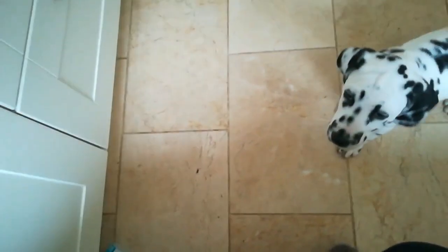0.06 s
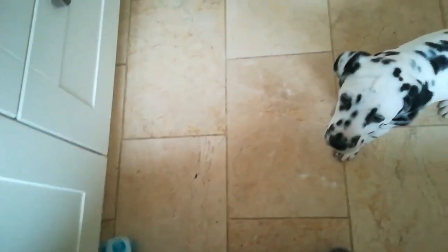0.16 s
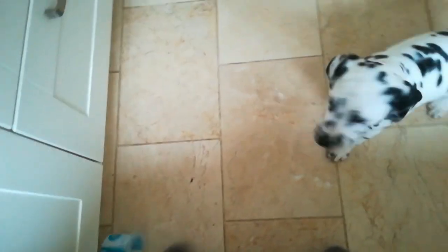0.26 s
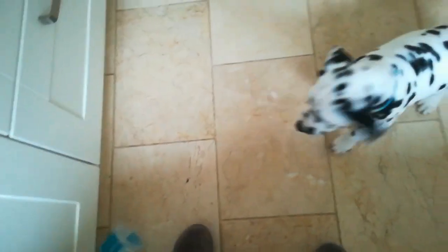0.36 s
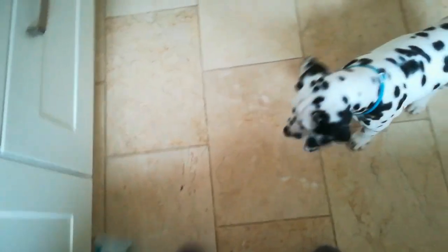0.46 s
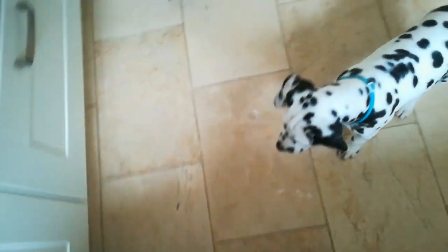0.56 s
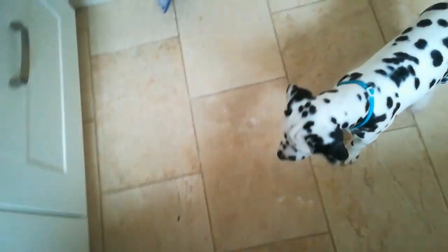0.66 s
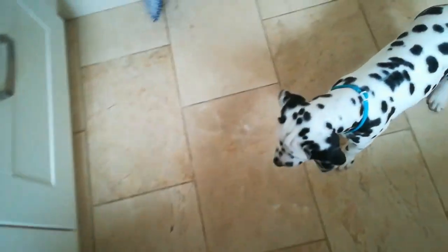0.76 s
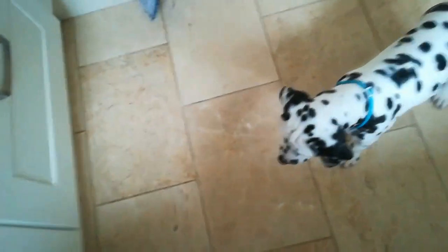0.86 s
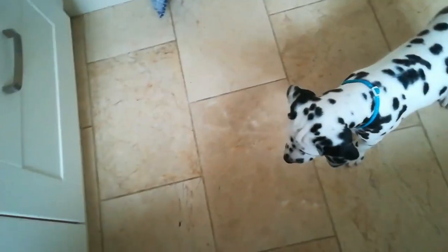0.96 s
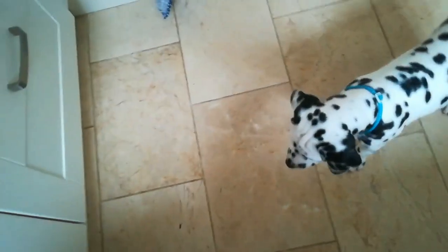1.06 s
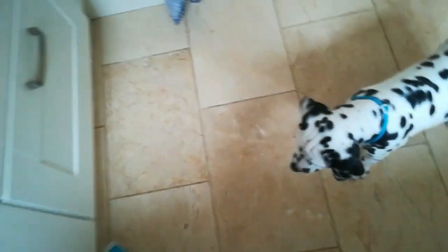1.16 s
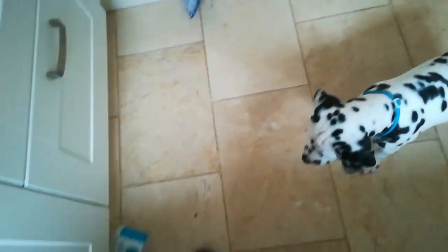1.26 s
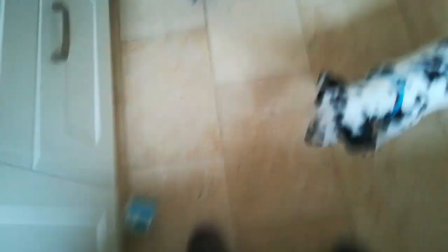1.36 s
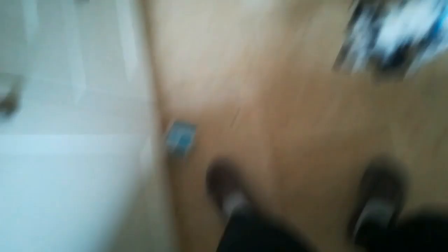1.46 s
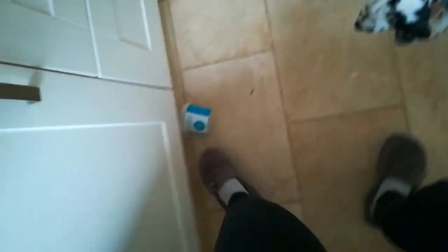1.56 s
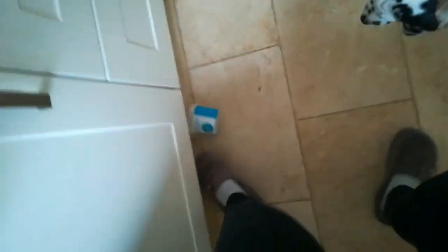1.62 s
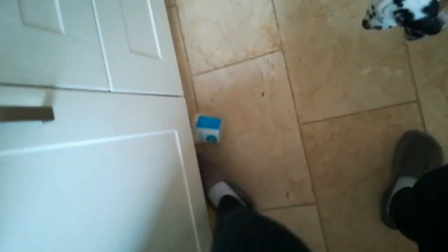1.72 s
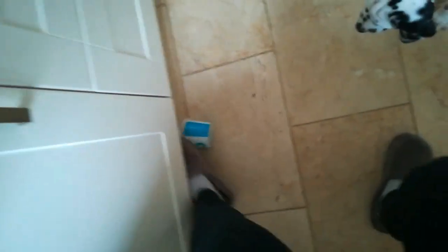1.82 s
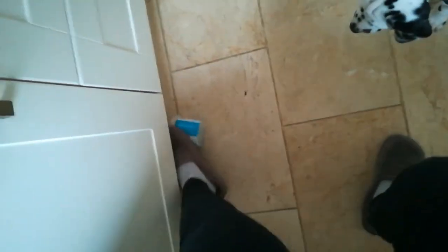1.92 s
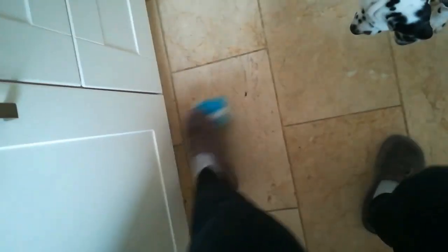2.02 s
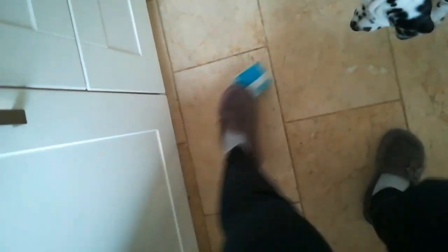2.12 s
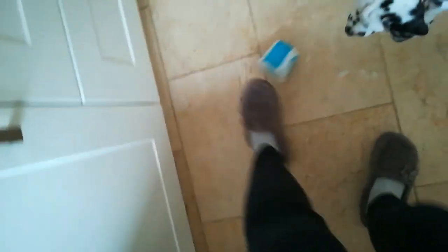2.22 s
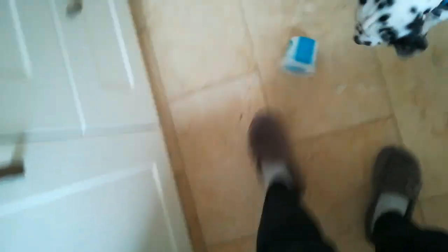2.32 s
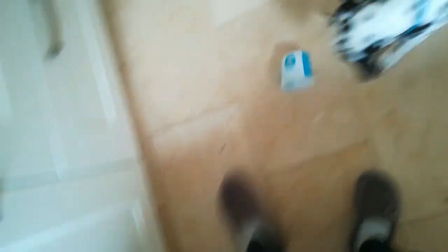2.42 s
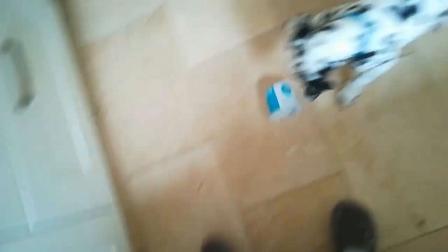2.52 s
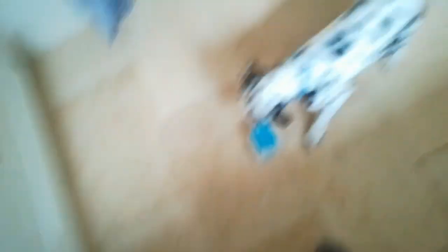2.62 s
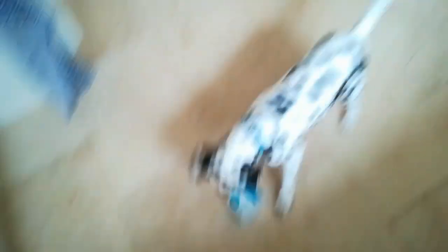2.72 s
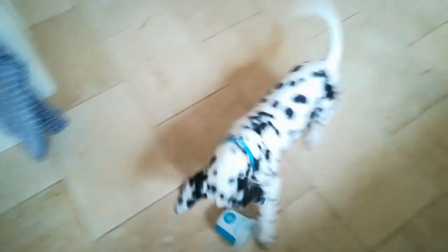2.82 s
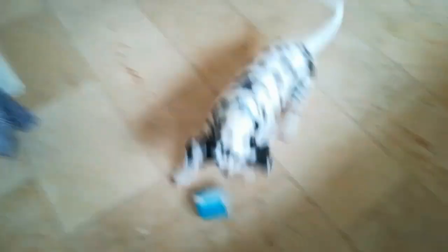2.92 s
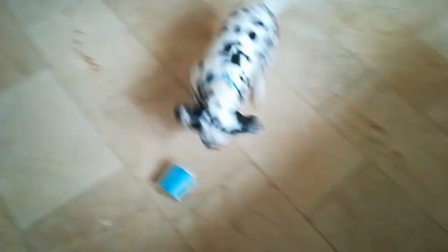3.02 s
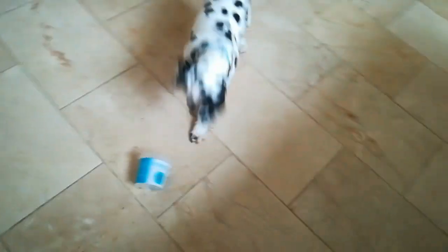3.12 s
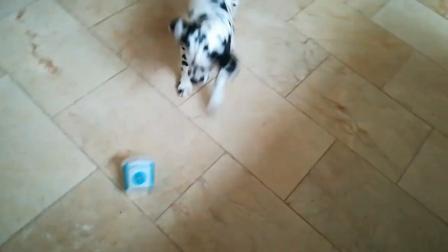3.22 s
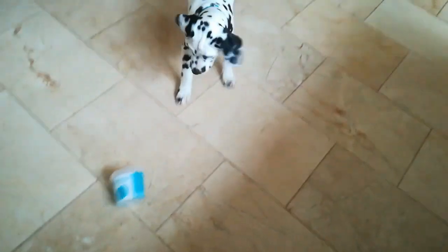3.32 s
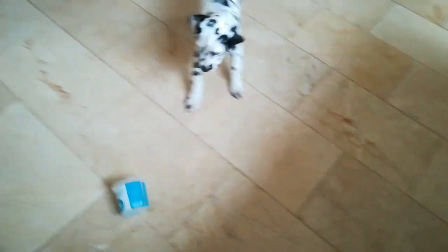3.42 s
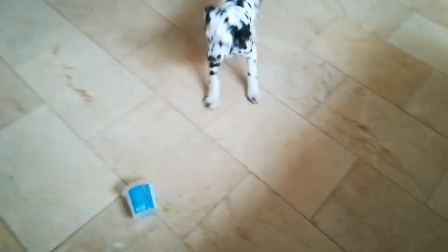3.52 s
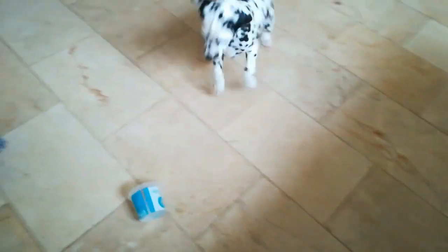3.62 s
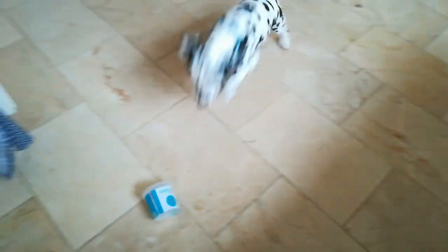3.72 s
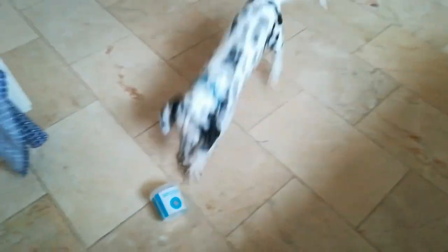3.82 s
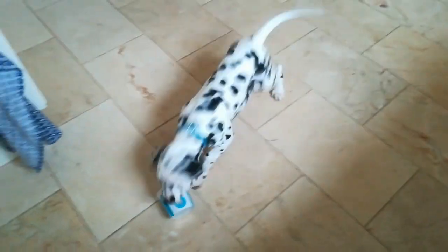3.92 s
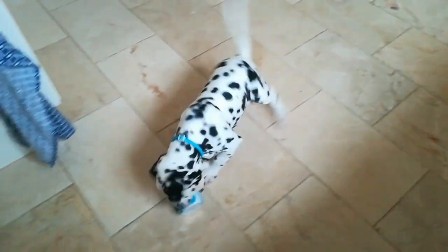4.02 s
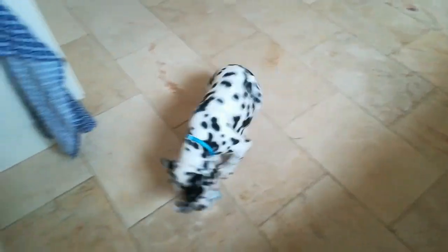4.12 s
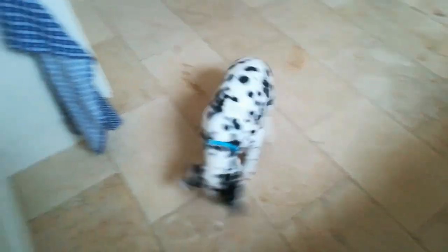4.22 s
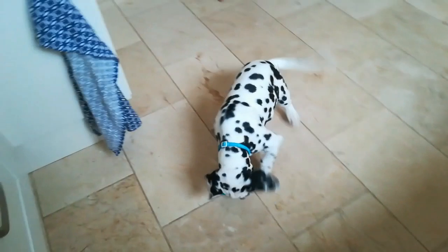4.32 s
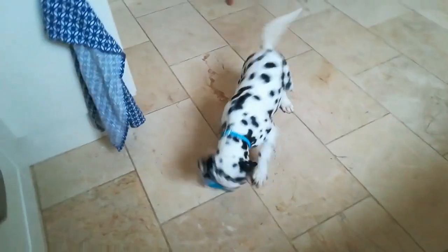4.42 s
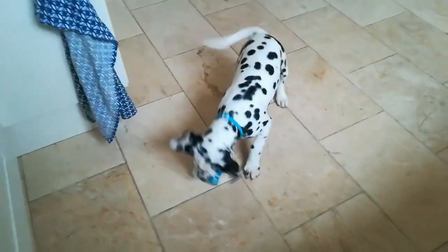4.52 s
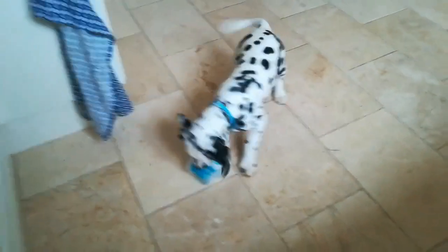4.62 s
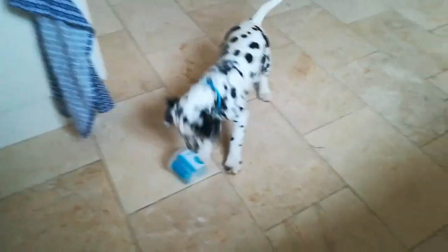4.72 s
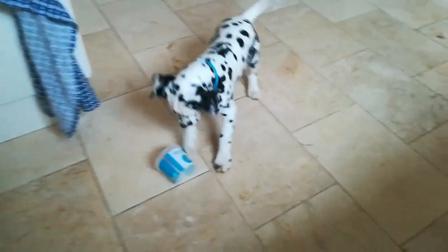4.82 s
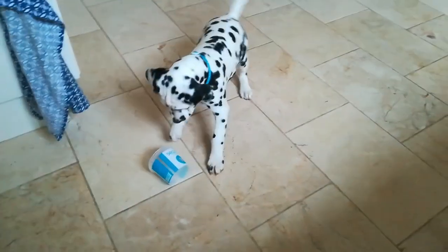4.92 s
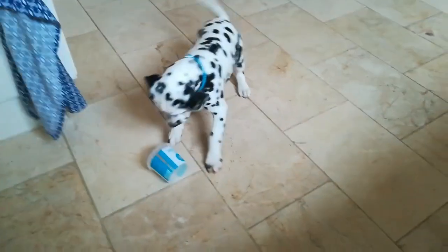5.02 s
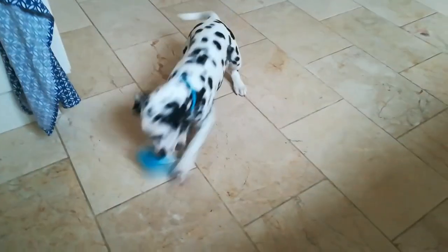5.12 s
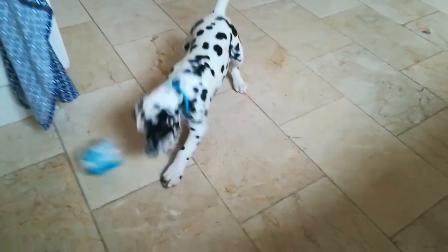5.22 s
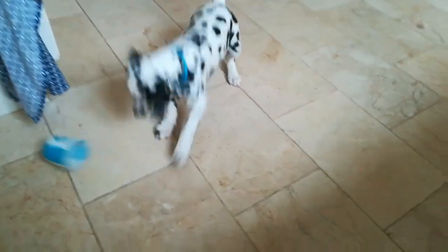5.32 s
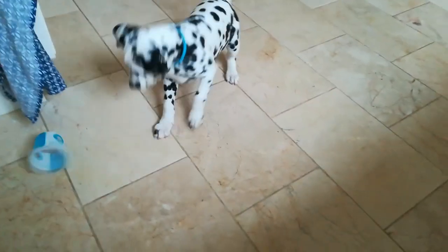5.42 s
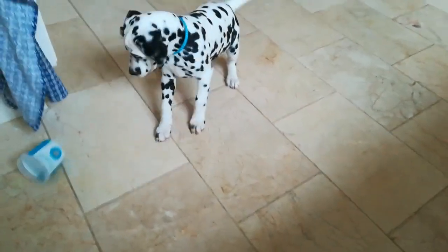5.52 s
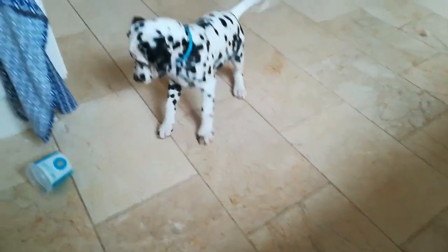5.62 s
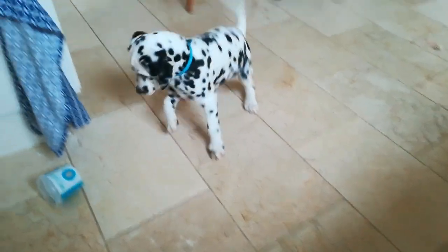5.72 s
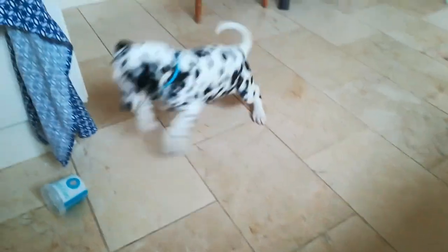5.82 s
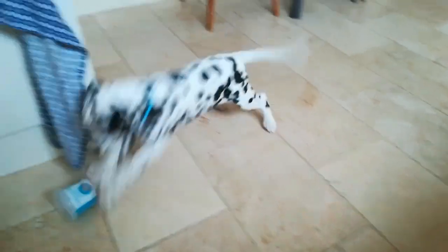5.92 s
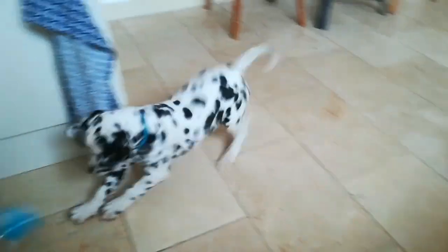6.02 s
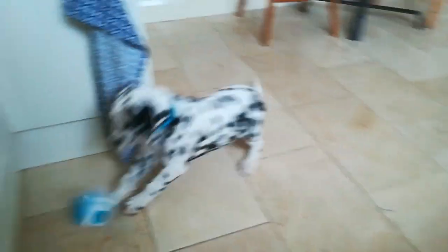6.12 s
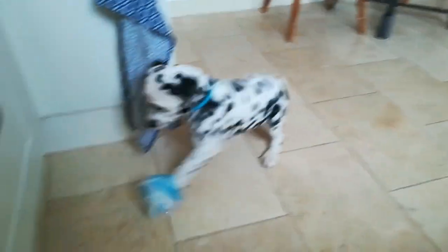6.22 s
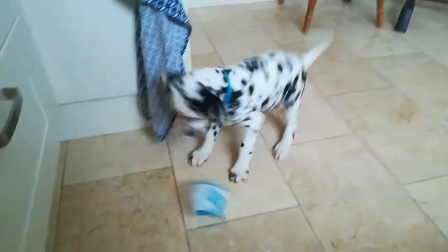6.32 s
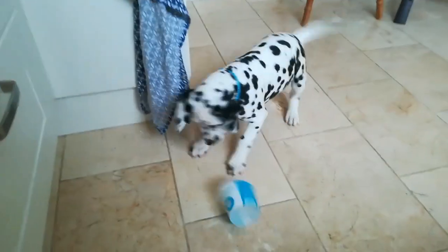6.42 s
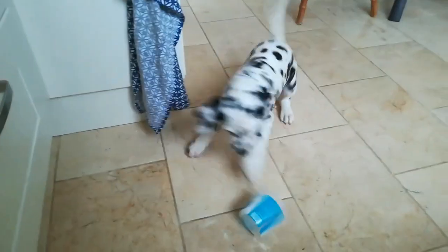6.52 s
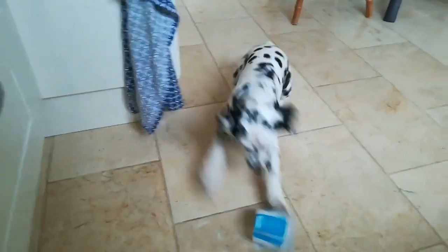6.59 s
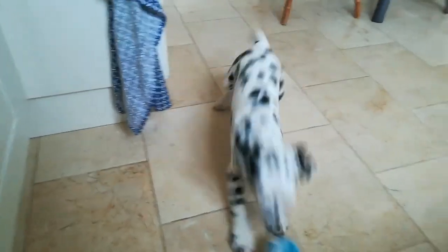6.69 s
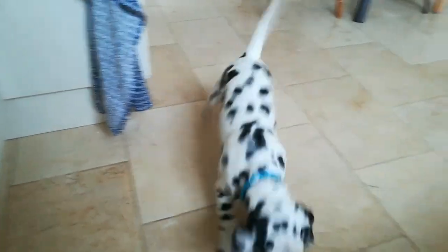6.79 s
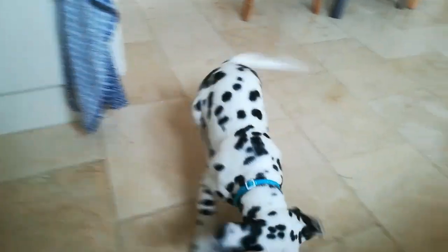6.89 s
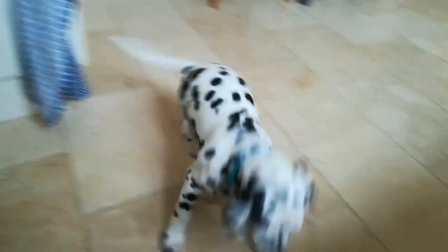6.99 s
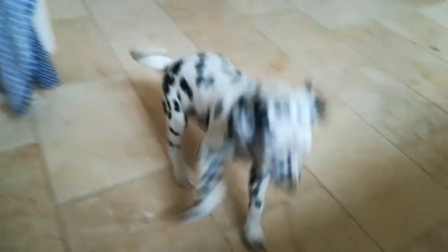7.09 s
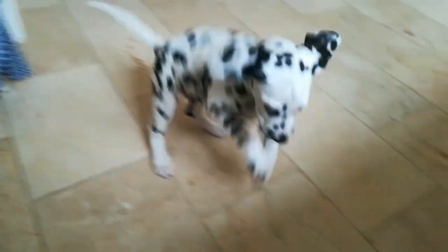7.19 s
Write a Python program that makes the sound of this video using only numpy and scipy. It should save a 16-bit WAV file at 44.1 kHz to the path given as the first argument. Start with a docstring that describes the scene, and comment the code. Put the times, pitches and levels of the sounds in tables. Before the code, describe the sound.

In a hard, echoing kitchen, a soft low footfall comes before a short run of hollow plastic knocks. A kick sends the container clattering and scraping over tiles. Paw scuffs, claw clicks and lighter taps follow with quieter gaps, until a violent slam into a cupboard rings out and more sharp bounces die away. Close handheld stereo microphones add faint rumble and hiss.

```python
"""A faint low rumble under hiss, a soft footfall, then hollow knocks and scrapes across a tiled kitchen floor.
A puppy chases a small plastic container: modal rings make its knocks and footfalls, shaped noise its
scrapes, claw clicks and paw scuffs. Near six seconds a hard swipe crashes it into a cupboard; a duller,
ringing echo lingers. Banded, decaying noise gives the hard room's echo; two microphones colour the result."""
import sys
import numpy as np
from scipy import signal
from scipy.fft import rfft, irfft, next_fast_len
from scipy.io import wavfile

SR = 44100
rng = np.random.default_rng(int(sys.argv[2]) if len(sys.argv) > 2 else 0)


def master(y):
    """Save y as 16-bit WAV."""
    cut = np.clip(np.atleast_2d(y).T, -1, 1)
    pcm = np.round(cut * 32767)  # scale
    wavfile.write(sys.argv[1], SR, pcm.astype(np.int16))


N = 319813
TIME = np.arange(N) / SR  # s

# pushes that slide the container: start_s, length_s, level_db, slowing_db_per_s, bite_db of the rim on the tile
SLIDE_MOVES = [(0.036, 0.26, -50.5, 7, -14), (1.878, .13, -61.5, 1, 7), (2.005, 0.096, -34.5, 18, 6.5),
               (2.114, 0.4, -38.5, 10, -4), (2.548, 0.22, -44, 20, -14.5), (2.88, .38, -48, 4.5, 5.5),
               (3.837, .255, -44.5, 20.5, 11.5), (4.131, 0.17, -50.5, 11, -4),
               (4.281, 0.15, -43.5, 4, -1.5), (4.51, .13, -45, 68.5, -11.5), (5.114, 0.25, -45.5, 7, 0),
               (5.351, .17, -42, 24, -2), (5.539, 0.09, -43.5, 38, -9.5), (5.96, .06, -30.5, 6, 6.5),
               (6.587, 0.38, -38.5, 48, -5), (7.0, 0.23, -52.5, 24, -3)]
# ring of the stiff container walls: pitch_hz before detuning, level_db, t60_s
STIFF_WALLS = [(2748, -2.5, 0.039), (3536, -1, 0.026), (4148, 1.5, 0.014), (4580, -3, 0.02),
               (5800, -10.5, .012), (6260, -11.5, 0.0071), (7540, -20.5, .008)]
# bright spectrum of hard edges and grit on tile: frequency_hz, level_db
GRIT_SPECTRUM = [(4000, -28.5), (7500, -5.5), (10000, 1.5), (13000, -3.5), (16000, -7)]


def undb(db):
    """Decibels to gain."""
    return 10 ** (np.asarray(db) / 20)


def fade(t, t60):
    """Exponential decay, 60 dB down after t60 seconds."""
    return np.exp(-np.log(1000) * t / t60)


def unit(x):
    """Scale to an rms of one."""
    return x / np.sqrt(np.mean(x ** 2))


def band(x, lo_hz, hi_hz, order=3):
    """Causal band-pass."""
    sections = signal.butter(order, [lo_hz, min(hi_hz, SR / 2 - 10)], "band", fs=SR, output="sos")
    return signal.sosfilt(sections, x)


def colour(x, points):
    """Filter x by a curve of (Hz, dB) points, joined by straight lines over log frequency."""
    hz, db = np.transpose(points)
    size = next_fast_len(x.shape[-1] + 4096)  # padding keeps the filter's tail from wrapping round
    f = np.maximum(np.arange(size // 2 + 1) * SR / size, 1)
    gain = undb(np.interp(np.log(f), np.log(hz), db))
    return irfft(rfft(x, size) * gain, size)[..., :x.shape[-1]]


def resonate(x, hz, width_hz):
    """One resonance, gain one at its centre."""
    return signal.lfilter(*signal.iirpeak(hz, hz / width_hz, SR), x)


def pair(size, alike):
    """Noise at the two microphones, with a share of its power in common."""
    alike = np.clip(alike, 0, 1)
    common = np.sqrt(alike) * rng.standard_normal(size)
    return common + np.sqrt(1 - alike) * rng.standard_normal((2, size))


def grains(size, spread_db, alike, count=24):
    """Noise broken into tiny contacts, count samples long, of very uneven strength."""
    strength = undb(spread_db * np.minimum(rng.exponential(size=size // count + 1), 5))
    return unit(pair(size, alike) * np.repeat(strength, count)[:size])


def panned(db):
    """Channel gains for a left minus right level in dB."""
    return undb(np.array([[db], [-db]]) / 2)


def add(out, s, sound):
    """Mix a sound in at time s, in seconds."""
    start = min(max(int(s * SR), 0), N - 1)
    out[:, start:start + sound.shape[1]] += sound[:, :N - start]


def house():
    """Low rumble largely common to both microphones, under hiss that is mostly separate."""
    # spectrum of the quiet house and microphone hiss: frequency_hz, level_db
    quiet_spectrum = [(15, -35), (25, -4), (64, -24.5), (107, -11), (130, -31), (189, -24.5), (262, -28.5),
                      (300, -37), (622, -40), (1640, -37), (6690, -44), (12500, -43), (15900, -53)]
    air = band(pair(N, 0.59), 6.9, 270) + band(pair(N, 0.13), 230, 17000)
    return unit(colour(air, quiet_spectrum)) * undb(-62.5)


def thuds(size=24000):
    """A heel lands and the floor booms, alike at both microphones; each bump rings for its own length."""
    # heavy footfalls and bumps: start_s, peak_db, pitch_hz, ring_length as a share of the full boom
    footfalls = [(0.014, -39, 118.5, 1.24), (0.715, -9.5, 101.6, 0.64), (0.834, -34, 99.8, 1.3),
                 (0.955, -39, 76.5, 1.5), (3.914, -34.5, 93.8, 1.4), (3.96, -32, 128.7, 0.9),
                 (6.037, -24, 55, 0.97), (6.393, -29.5, 59.6, 0.028)]
    # what a footfall sets ringing: multiple of its pitch, level_db, t60_s of the full boom
    boom_modes = [(.7, -20.5, 0.7), (0.999, -2.5, 0.16), (1.1, -19.5, 0.48), (1.35, -5.5, 0.12),
                  (2.058, -10.5, 0.16), (3.751, -25.5, 0.21), (4.649, -30, 0.16)]
    out, t = np.zeros((2, N)), TIME[:size]
    for s, db, hz, length in footfalls:
        length = max(length, .05)
        boom = sum(undb(mode_db) * np.sin(2 * np.pi * hz * multiple * t) * fade(t, t60 * length)
                   for multiple, mode_db, t60 in boom_modes)
        boom = boom * (1 - np.exp(-t / 0.0067))  # soft onset
        add(out, s, undb(db) * boom[None] / np.abs(boom).max())
    return out


def echo(early_db=-11, late_db=-8.5, size=26000):
    """Floor and cupboards answer at once; the diffuse echo swells in and loses its treble first."""
    # echo tone: frequency_hz, level_db
    room_tone = [(60, -16.5), (200, -3), (350, 3), (460, 9), (600, -0.5), (900, 5), (1400, 2.5), (2000, 2),
                 (2500, 2.5), (2750, 3.5), (3100, 1.5), (5500, 4.5), (8500, 5), (15000, 1.5)]
    # echo decay: frequency_hz, t60_s
    room_fade = [(100, 0.74), (500, 0.4), (1400, 0.44), (2700, 0.43), (6000, 0.43), (9000, 0.23),
                 (15000, 0.15)]
    t = TIME[:size]
    hz, t60 = np.transpose(room_fade)
    edges = np.geomspace(40, 18000, 12)
    late = np.zeros((2, size))
    for lo, hi in zip(edges, edges[1:]):
        alike = .9 if lo < 200 else .1  # bass nearly the same at both microphones
        band_t60 = np.interp(np.log(lo * hi) / 2, np.log(hz), t60)
        late += band(pair(size, alike), lo, hi) * fade(t, band_t60)
    late = late * (1 - np.exp(-t / 0.0071))
    early = grains(size, spread_db=3, alike=0.05, count=4) * fade(t, 0.03) * (t > .0015)
    mixed = undb(early_db) * unit(early) + undb(late_db) * unit(late)
    return colour(mixed, room_tone) / np.sqrt(size)


def kitchen(dry, count=4):
    """Container and microphones keep moving, so successive bounces meet different patterns of reflections."""
    # crossfade round a cycle of echoes, one step every 60 ms
    place = TIME / .06 % count
    wet = np.zeros((2, N))
    for k in range(count):
        distance = np.abs((place - k + count / 2) % count - count / 2)
        share = np.sqrt(np.maximum(1 - distance, 0))
        wet += signal.fftconvolve(dry * share, echo(), axes=1)[:, :N]
    return wet


def slides(judder_db=1.5, attack_s=0.013, release_s=0.02):
    """The rim catches on the rough tile many times a second: the faces drum, the walls rasp, grit hisses."""
    # drumming of the container faces: frequency_hz, level_db
    drum_spectrum = [(100, -25), (250, -13), (450, -5.5), (600, -7), (900, 1), (1400, -1.5), (2100, -9.5),
                     (3200, -20.5), (6000, -53.5)]
    # rasp of the container walls: frequency_hz, level_db
    rasp_spectrum = [(1200, -29), (2200, -10), (2750, 2), (3100, -4), (3700, 2), (5500, -1.5), (7000, -3),
                     (8500, -16.5), (12000, -44)]
    rasp_db, grit_db = -2.5, -18.5  # against the drumming, before bite
    rasp_bite = .3  # share of the bite that reaches the rasp; the grit takes all of it
    out = np.zeros((2, N))
    # the pressure on the rim jumps about as the container rocks
    judder = undb(judder_db * unit(band(rng.standard_normal(N), 8.1, 70)))
    catches = grains(N, spread_db=2.5, alike=0.23) * judder
    drum = unit(colour(catches, drum_spectrum)) * panned(-1.0)
    rasp = unit(colour(catches, rasp_spectrum))
    grit = unit(colour(catches, GRIT_SPECTRUM))
    for s, length, db, slowing, bite_db in SLIDE_MOVES:
        # a push gets it going quickly, friction slows it, then it stops
        moving = np.flatnonzero((TIME > s) & (TIME < s + length + release_s))
        t = TIME[moving] - s
        start = np.minimum(t / attack_s, 1)
        stop = np.minimum(1 - (t - length) / release_s, 1)
        speed = start * undb(-slowing * t) * stop
        scrape = drum[:, moving] + undb(rasp_db + rasp_bite * bite_db) * rasp[:, moving]
        scrape += undb(grit_db + bite_db) * grit[:, moving]
        out[:, moving] += undb(db) * speed * scrape
    return out


def shell(modes, t, tone_hz, octaves, scatter, alike, detune=0.036):
    """Ring modes; each point of contact favours those near its tone and weights them anew."""
    hz, db, t60 = np.transpose(modes)
    hz = hz * (1 + detune * rng.standard_normal(len(hz)))
    nearness = np.exp(-.5 * (np.log2(hz / tone_hz) / octaves) ** 2)
    weight = undb(db) * nearness * (1 + scatter * pair(len(hz), alike))
    rings = np.sin(2 * np.pi * hz[:, None] * t) * fade(t, t60[:, None])
    return unit(weight @ rings)


def tick(t):
    """The brief bright snap of a hard edge on tile, as decaying coloured noise."""
    return unit(colour(pair(len(t), 0.39), GRIT_SPECTRUM) * fade(t, .012))


def knock(db, tone_hz, edge, hollow_hz=455, hollow_db=-16, size=4096):
    """A landing rings the hollow faces and the thin walls, with a snap on top."""
    # low modes that move whole faces: pitch_hz before detuning, level_db, t60_s
    whole_faces = [(518, -13, 0.052), (785, -23, 0.011), (986, -1, 0.015), (1202, -0.5, 0.013),
                   (1434, 8.5, 0.009), (1709, -3.5, .012), (2240, -11.5, 0.023)]
    # nearer the rim the walls ring and the edge ticks more: level on a flat face, rise up to the rim
    wall_db, wall_rise_db = -11.5, 8.5
    tick_db, tick_rise_db = -59, 40.5
    t = TIME[:size]
    # a gentle tap is a long contact that wakes few modes; a hard one is short and wakes many
    contact_s = np.interp(db, [-30, -8], [.0014, .0005])
    reach = np.interp(db, [-30, -8], [.45, .65])  # scales the octaves around the tone
    swing = 1 - np.exp(-(t / contact_s) ** 2)
    faces = unit(shell(whole_faces, t, tone_hz, octaves=0.95 * reach, scatter=0.42, alike=0.97) * swing)
    burst = pair(size, 0.4) * fade(t, .022)
    chatter = unit(band(burst, tone_hz / 2 ** (1.1 * reach), tone_hz * 2 ** reach, order=4))
    # the air in the tub hums wherever it is struck; so small a body radiates no bass
    hollow = unit(np.sin(2 * np.pi * hollow_hz * t) * fade(t, 0.033))
    faces = unit(band(faces + undb(-2) * chatter + undb(hollow_db) * hollow, 350, 8000))
    crack = unit(band(pair(size, 0.1) * fade(t, .022), 1900, 6320, order=4))
    wall_ring = unit(shell(STIFF_WALLS, t, 4300, octaves=1.9, scatter=0.88, alike=0.13) * swing)
    walls = unit(wall_ring + crack)
    pan_db = -2 - rng.standard_normal()  # left minus right, scattered by 1 dB
    sound = faces * panned(pan_db) + undb(wall_db + wall_rise_db * edge) * walls
    sound += undb(tick_db + tick_rise_db * edge) * tick(t)
    return sound * undb(db) / np.abs(faces.mean(0)).max()


def container(count=2):
    """The container tumbles in clear knocks, and rocks into a few random taps during every slide."""
    # landings on the tiles: start_s, peak_db of the face ring, pitch_hz of the hollow tone,
    # edge (0 flat on a face to 1 on the rim)
    landings = [(0.053, -27, 1074, 0), (0.175, -33, 990, 0.24), (0.217, -28, 1090, 0),
                (0.329, -22, 1110, 0.52), (1.046, -10, 960, 0.28), (1.118, -11.5, 1180, 0.3),
                (1.164, -16, 1017, 0.55), (1.211, -23.5, 1130, 0.49), (2.099, -10, 1240, 0.86),
                (2.179, -3.5, 1330, 0.5), (2.239, -6, 1300, 0.61), (2.296, -12, 1220, 0.78),
                (2.338, -15, 1250, 0.93), (2.374, -15, 1370, 1), (2.402, -19.5, 1080, 0.98),
                (2.582, -13.5, 1130, 0.1), (2.634, -15.5, 1140, 0.66), (2.659, -16.5, 1160, 0.67),
                (2.687, -23, 1500, 0.42), (2.782, -21, 1010, 0.2), (2.97, -17, 1400, 0.91),
                (3.047, -16.5, 1330, 0.62), (3.106, -15, 1280, 0.13), (3.145, -20.5, 1520, .25),
                (3.379, -35.5, 894, 0.18), (3.412, -26.5, 920, 0.2), (3.502, -37, 870, 0),
                (3.573, -35.5, 924, 0), (4.342, -27, 1320, 0.59), (4.395, -16.5, 1470, 0.6),
                (4.486, -13, 1406, 0.42), (5.359, -24.5, 920, 0.43), (5.381, -21, 980, .4),
                (5.396, -24.5, 1620, 0.85), (5.411, -28, 1190, 0.92), (5.586, -35, 910, .5),
                (5.943, -29.5, 1300, 0.031), (6.376, -2.5, 1470, 0.71), (6.395, -12.5, 1560, 1),
                (6.513, -6.5, 1330, 0.18), (6.623, -5, 1750, 0.66), (6.662, -17, 1750, 0.93),
                (6.69, -21, 1560, 0.99), (6.74, -20.5, 1490, 0.78), (6.762, -23.5, 1450, .8),
                (6.798, -22.5, 1720, 0.33), (6.818, -21, 1530, 0.5), (7.105, -29, 1130, 0.55),
                (7.131, -29.5, 1520, 0.76), (7.161, -31, 1330, .25), (7.213, -33.5, 1630, .25)]
    above_slide_db, spread_db = 9, 4  # tap peak and its scatter
    tap_hz, spread_octaves, tap_edge = 1182, .25, 0.7
    out = np.zeros((2, N))
    for s, db, tone_hz, edge in landings:
        add(out, s, knock(db, tone_hz, edge))
    for s, length, db, slowing, _ in SLIDE_MOVES:
        moments, chances = rng.random(count), rng.standard_normal((count, 2))
        for share, (force, spot) in zip(moments, chances):
            delay = share * length
            tap_db = db - slowing * delay + above_slide_db + spread_db * force
            add(out, s + delay, knock(tap_db, tap_hz * 2 ** (spread_octaves * spot), tap_edge))
    return out


def scuffs(size=20000):
    """A skid is a dying burst of small contacts: low weight, pad slap, plastic rasp, a resonance and hiss."""
    # paws and slippers scuff and shove: start_s, level_db, t60_s, weight_db, resonance_hz
    skids = [(0.172, -42, 0.094, -2, 2060), (0.715, -32, 0.091, -27, 484), (0.871, -42.5, 0.054, 6, 406),
             (0.974, -28, 0.058, -13.5, 468), (1.918, -32, 0.062, -6.5, 448),
             (1.978, -40.5, 0.46, -13, 490), (2.24, -55.5, 1, 5.5, 487), (2.949, -55, 1, -2, 476),
             (3.853, -31.5, .2, -1, 706), (3.902, -23, 0.16, -17, 2340), (3.922, -19, 0.06, -26, 1950),
             (3.95, -29, 0.12, -8, 2150), (3.965, -37.5, 0.37, -11, 1185), (4.226, -42, 0.081, -4, 464),
             (4.256, -45, 0.2, -2.5, 654), (5.115, -31.5, 0.11, 2.5, 362), (5.16, -41, 0.2, 2, 400),
             (5.557, -42, 0.11, -14, 473), (5.612, -42, 0.054, -16.5, 2800), (5.965, -25.5, 0.21, -7, 708),
             (5.982, -13.5, 0.045, -9, 1700)]
    soft_hz = 460  # a soft pad's resonance
    out, t = np.zeros((2, N)), TIME[:size]
    for s, db, t60, weight_db, ring_hz in skids:
        # each octave up towards claw on plastic has less slap and more hiss
        hardness = np.log2(ring_hz / soft_hz)
        pad_db, hiss_db = 1 - 5.5 * hardness, -8.5 + 2.5 * hardness
        rub = grains(size, spread_db=3.5, alike=0.43)
        weight = undb(weight_db) * unit(band(pair(size, 0.91), 110, 300))
        pad = undb(pad_db) * unit(band(rub, 290, 1030))
        rasp = unit(band(rub, 990, 2600)) * panned(-3.5)
        ring = undb(0.5) * unit(band(pair(size, 1.0), .92 * ring_hz, ring_hz / .92, order=2))
        bright = unit(band(rub, 2700, 7500)) + undb(-16.5) * unit(colour(rub, GRIT_SPECTRUM))
        hiss = undb(hiss_db) * bright
        envelope = fade(t, t60) * (1 - np.exp(-t / 0.0016))
        add(out, s, undb(db) * (weight + pad + rasp + ring + hiss) * envelope)
    return out


def claws(size=2048):
    """Claws and teeth ring the stiff walls in small hard clicks without the hollow tone."""
    # claw and tooth clicks: start_s, peak_db of the ring, pitch_hz, tick_db against the ring
    contacts = [(0.6396, -28.5, 6460, -46), (2.5504, -28.5, 4560, -37), (2.8673, -22, 2500, -35),
                (4.1622, -32, 6120, -37.5), (4.2552, -24, 2600, -39.5), (5.2491, -24, 7000, -8.5),
                (5.5746, -27, 2770, -33.5)]
    out, t = np.zeros((2, N)), TIME[:size]
    for s, db, hz, tick_db in contacts:
        modes = shell(STIFF_WALLS, t, hz, octaves=0.55, scatter=3.3, alike=.3)
        burst = unit(band(pair(size, 0.17) * fade(t, .02), 2400, 6860))
        ring = unit(modes + burst)
        add(out, s, (ring + undb(tick_db) * tick(t)) * undb(db) / np.abs(ring).max())
    return out


def crash(s=6.034, blow_db=-4.5, blow_t60=0.19, splash_t60=0.13, tail_db=-20.0, tail_t60=0.76,
          peaks_db=-3, size=36000):
    """The container slams into a cupboard in a clatter whose treble dies first; a duller, ringing echo lingers."""
    # clatter of the blow: frequency_hz, level_db
    crash_spectrum = [(35, -41), (60, -18), (287, -12.5), (447, -7), (538, -13.5), (800, -13.5), (1030, -5),
                      (1370, -3.5), (1690, -8), (2760, -4), (3100, -8.5), (5820, -10), (7700, -20.5),
                      (14100, -20), (15900, -28)]
    # lingering echo of the blow: frequency_hz, level_db
    tail_spectrum = [(59, -49), (100, -14), (293, -9), (332, -23), (425, -10), (630, -16.5), (972, 0.5),
                     (1920, -15), (2680, -6), (3090, -28), (3810, -11), (5750, -12), (14000, -58)]
    # resonances that ring in the lingering echo: frequency_hz, width_hz, level_db
    tail_peaks = [(1440, 100, 11), (2200, 160, 13), (2720, 71, 9), (3650, 110, 9.5), (4500, 41, -10),
                  (6000, 45, -3.5), (6620, 150, -14), (7880, 150, -22)]
    out, t = np.zeros((2, N)), TIME[:size]
    clatter = unit(colour(pair(size, 0.12), crash_spectrum))
    body = band(clatter, 30, 7500, order=5) * fade(t, blow_t60)
    splash = band(clatter, 6850, 22000, order=5) * fade(t, splash_t60)
    tail_noise = pair(size, 0.35)
    rings = sum(undb(db) * resonate(tail_noise, hz, width) for hz, width, db in tail_peaks)
    ringing = unit(colour(tail_noise, tail_spectrum)) + undb(peaks_db) * unit(rings)
    tail = unit(band(ringing, 270, 6900, order=4)) * fade(t, tail_t60)
    add(out, s, undb(blow_db) * (body + splash) + undb(tail_db) * tail)
    return out


def scene():
    """Everything on the floor, its echo, and the quiet house."""
    dry = container() + claws() + scuffs() + thuds() + slides() + crash()
    return dry + kitchen(dry) + house()


def microphones(x):
    """Two ports a hand apart hear nearly the same bass, and each colours the sound its own way."""
    # difference between the ports: frequency_hz, left_minus_right_db
    port_balance = [(120, 1), (330, 0.5), (700, -0.5), (1500, -1.5), (2800, -5.5), (4800, 4), (9000, 3.5),
                    (14000, 0.5)]
    mid, side = (x[0] + x[1]) / 2, (x[0] - x[1]) / 2
    # stereo width by frequency: (Hz, dB)
    side = colour(side, [(30, -4), (90, -11.5), (180, -4), (350, -2.5), (600, 6.0), (1200, 1)])
    left = colour(mid + side, [(hz, db / 2) for hz, db in port_balance])
    right = colour(mid - side, [(hz, -db / 2) for hz, db in port_balance])
    return np.array([left, right])


def record(dry):
    """The microphones' signal has peaks near full scale rounded off and its top cut above 16 kHz."""
    heard = microphones(dry)
    rounded = heard / (1 + heard ** 4) ** (1 / 4)
    top_cut = signal.ellip(10, .2, 70, 16000, fs=SR, output="sos")
    return signal.sosfilt(top_cut, rounded)


dry = scene()
out = record(dry)
master(out)
```